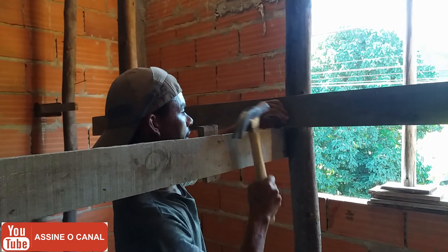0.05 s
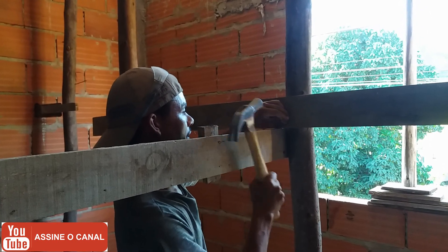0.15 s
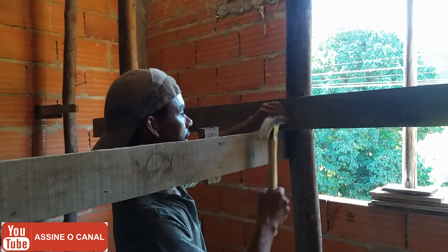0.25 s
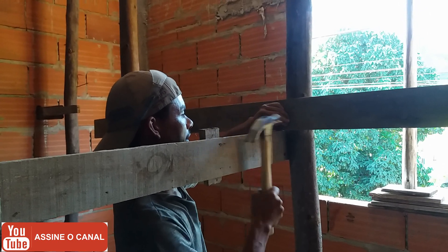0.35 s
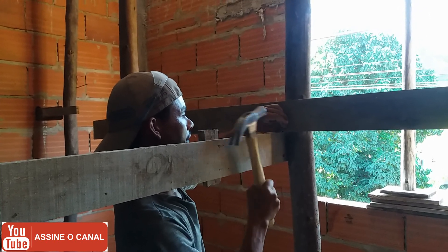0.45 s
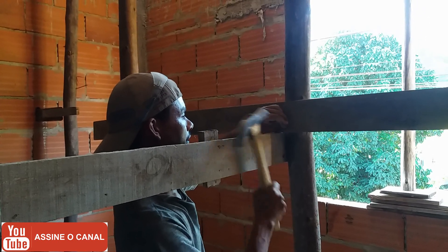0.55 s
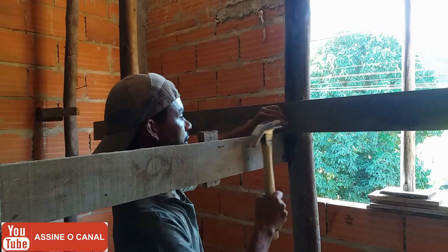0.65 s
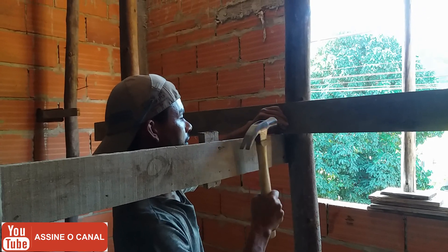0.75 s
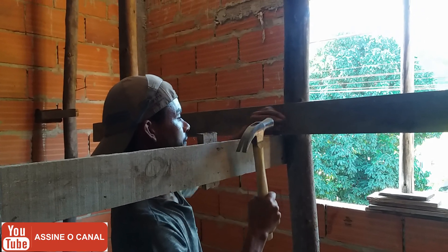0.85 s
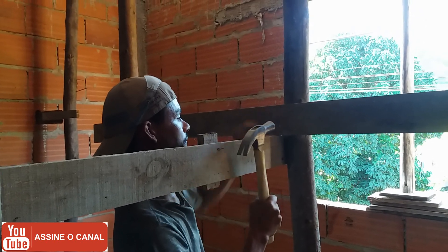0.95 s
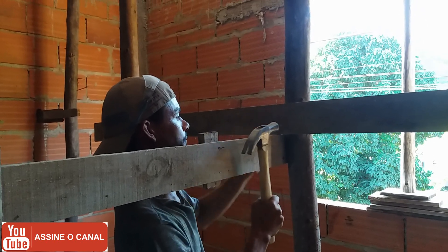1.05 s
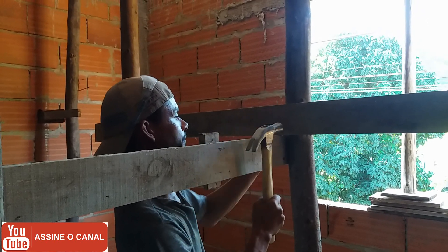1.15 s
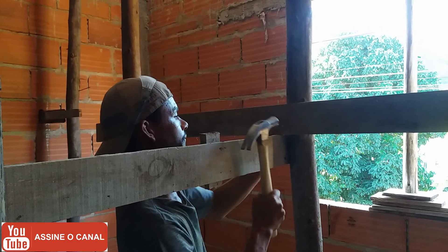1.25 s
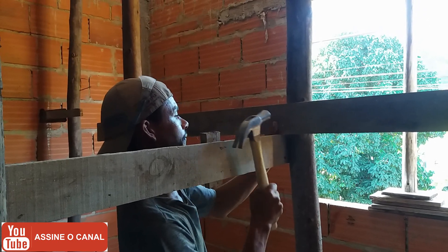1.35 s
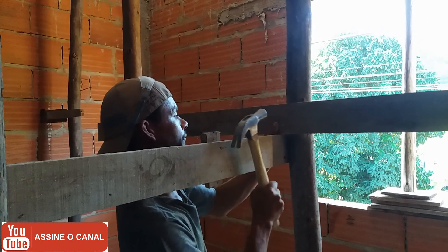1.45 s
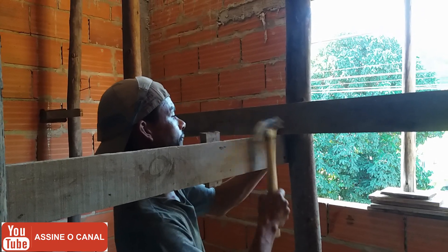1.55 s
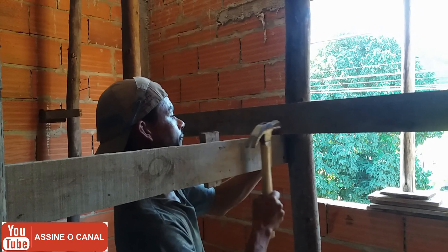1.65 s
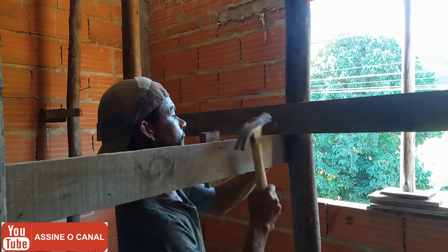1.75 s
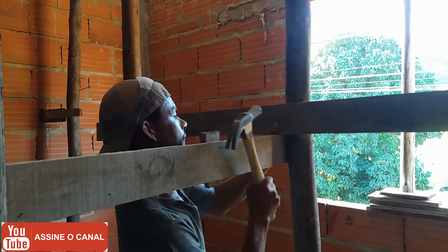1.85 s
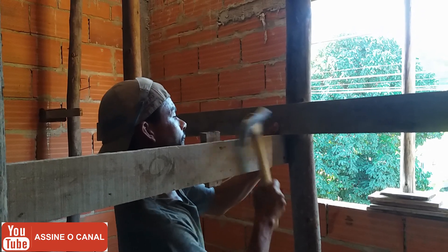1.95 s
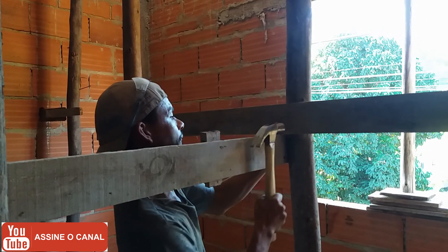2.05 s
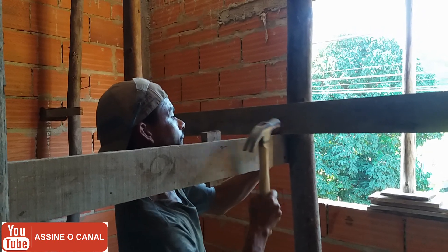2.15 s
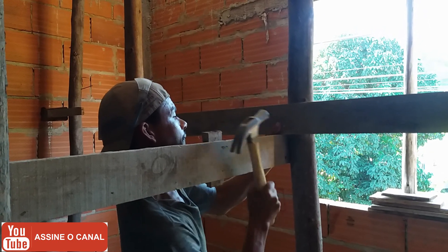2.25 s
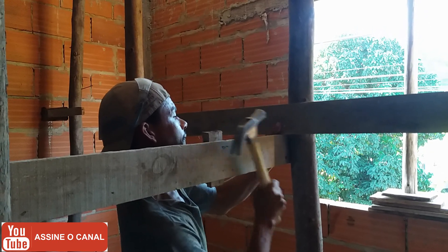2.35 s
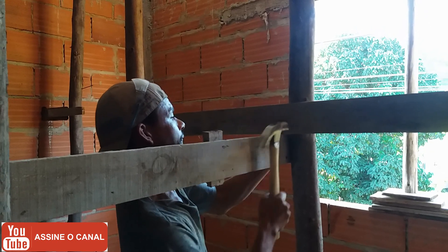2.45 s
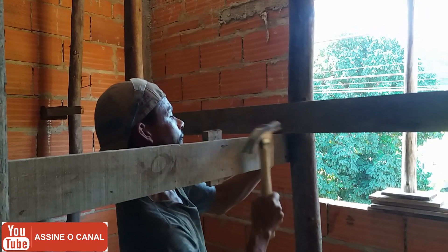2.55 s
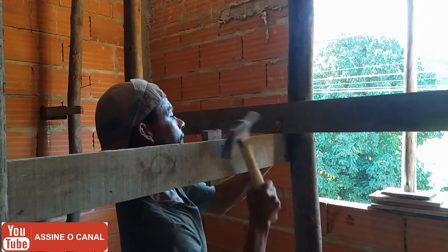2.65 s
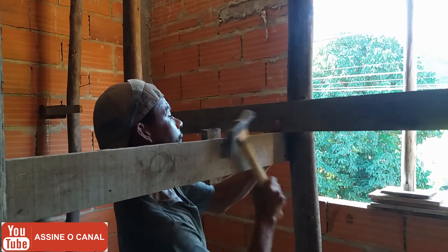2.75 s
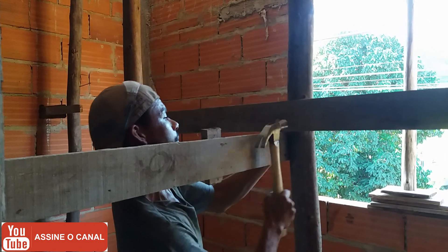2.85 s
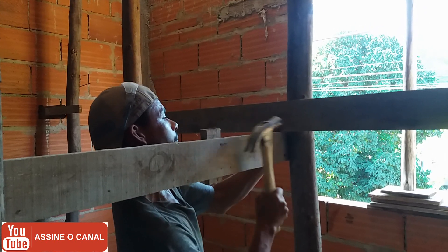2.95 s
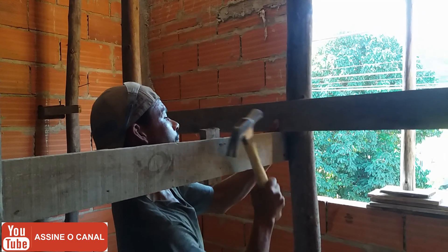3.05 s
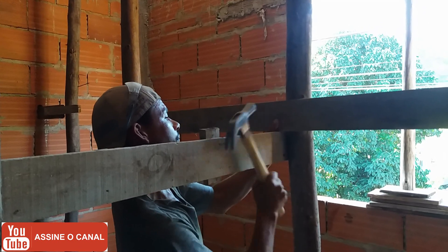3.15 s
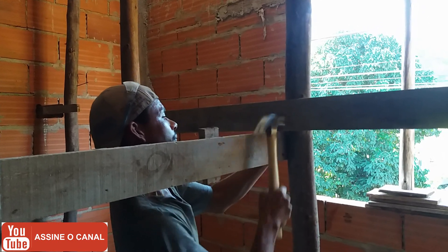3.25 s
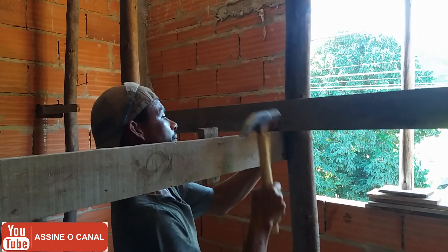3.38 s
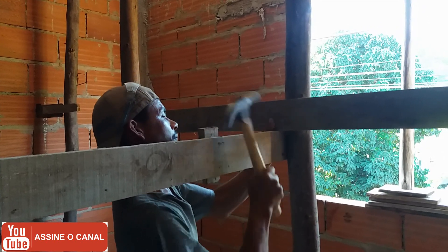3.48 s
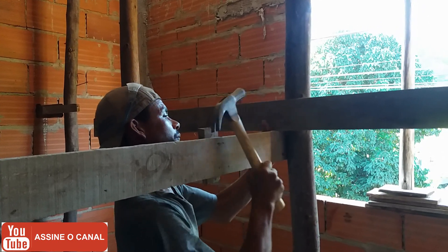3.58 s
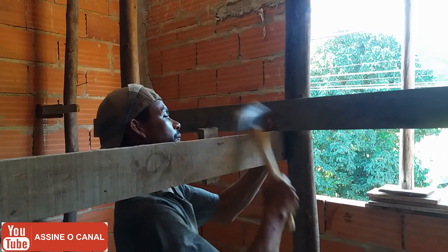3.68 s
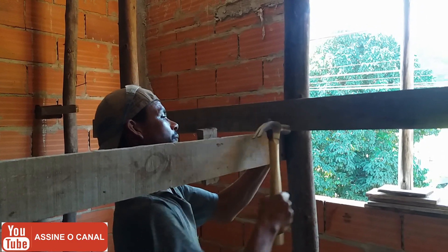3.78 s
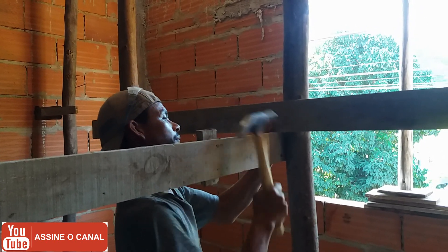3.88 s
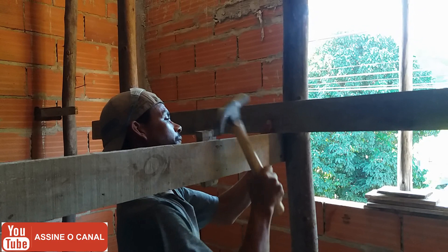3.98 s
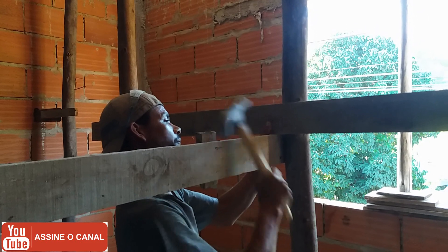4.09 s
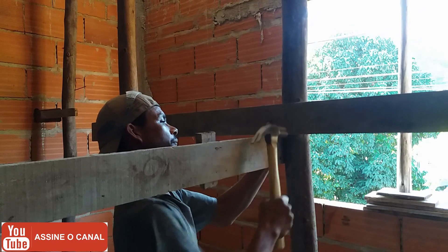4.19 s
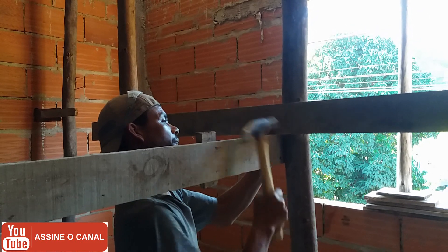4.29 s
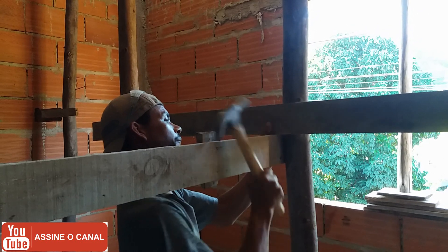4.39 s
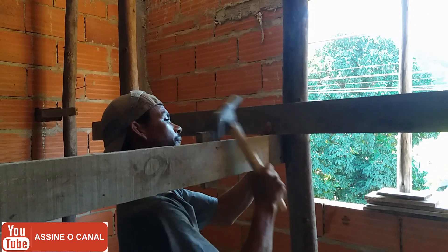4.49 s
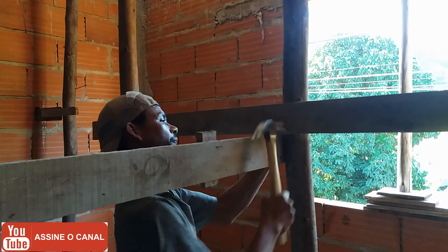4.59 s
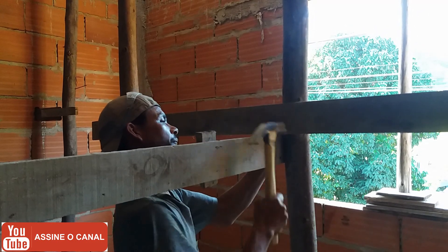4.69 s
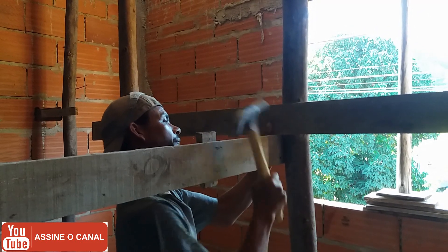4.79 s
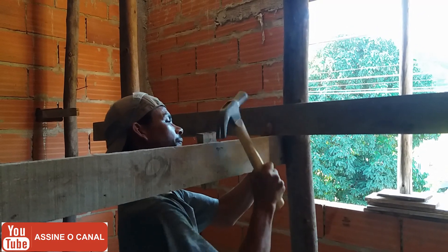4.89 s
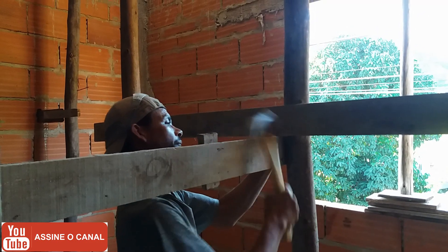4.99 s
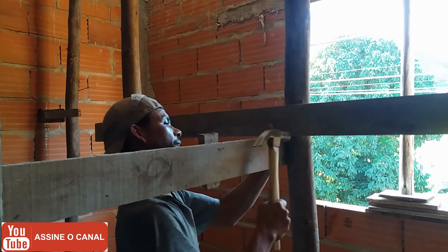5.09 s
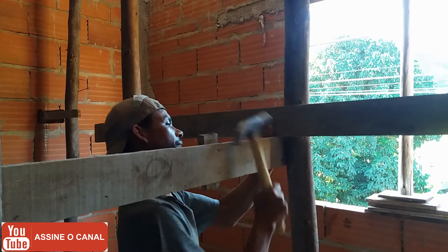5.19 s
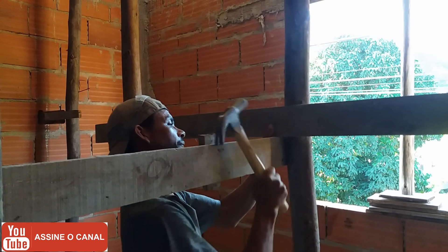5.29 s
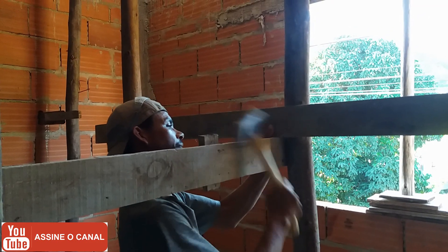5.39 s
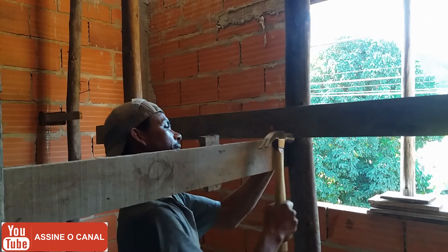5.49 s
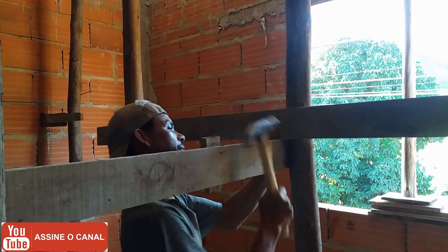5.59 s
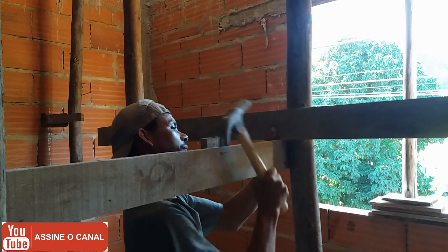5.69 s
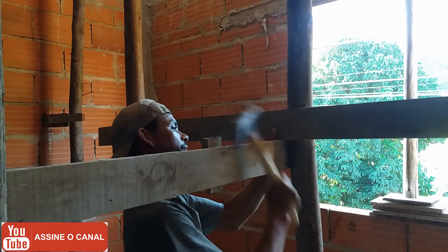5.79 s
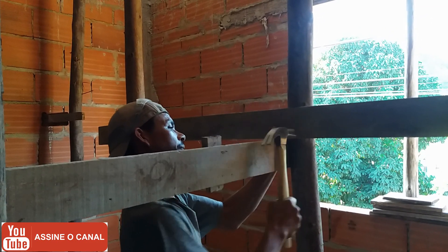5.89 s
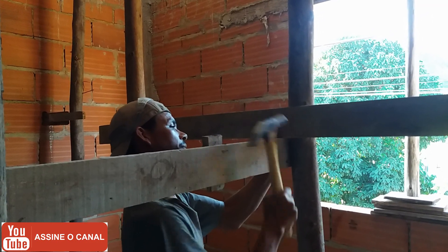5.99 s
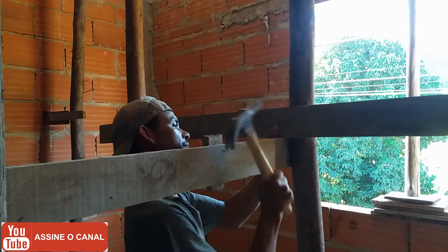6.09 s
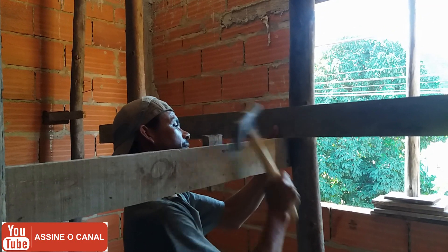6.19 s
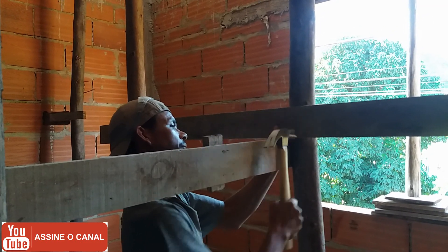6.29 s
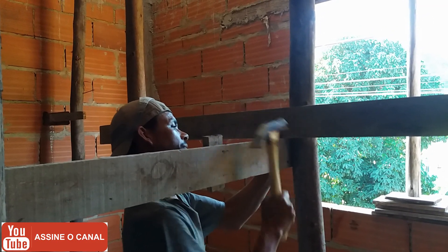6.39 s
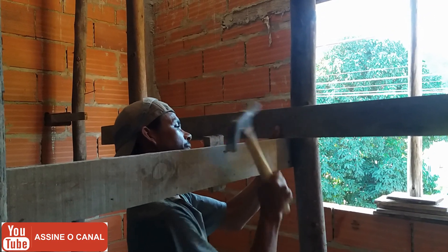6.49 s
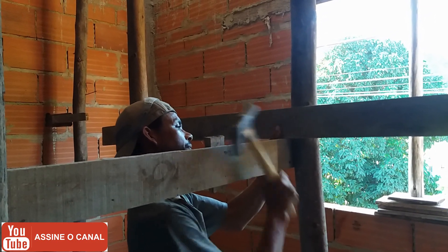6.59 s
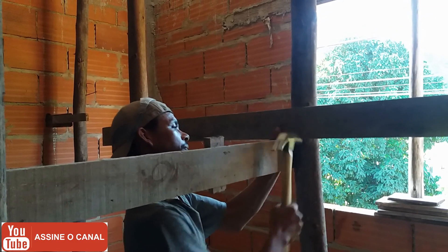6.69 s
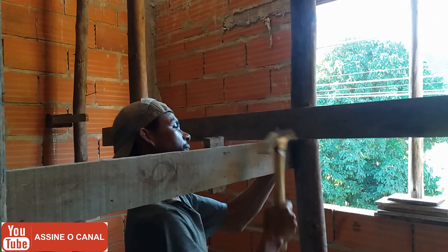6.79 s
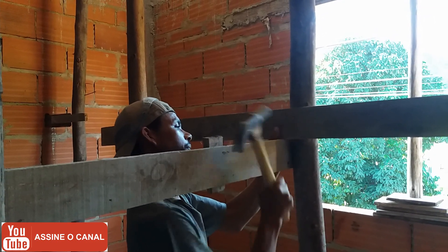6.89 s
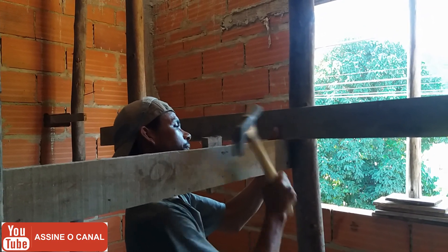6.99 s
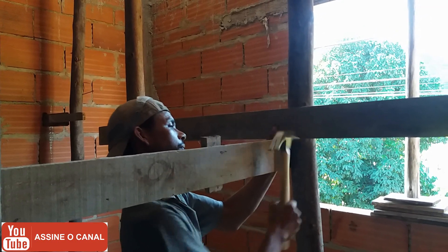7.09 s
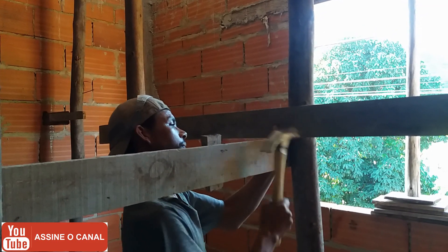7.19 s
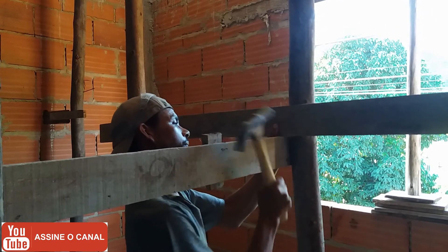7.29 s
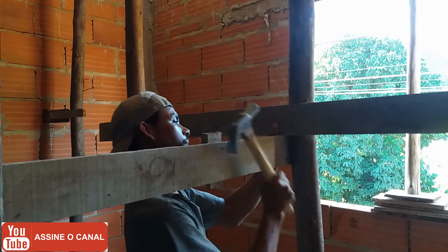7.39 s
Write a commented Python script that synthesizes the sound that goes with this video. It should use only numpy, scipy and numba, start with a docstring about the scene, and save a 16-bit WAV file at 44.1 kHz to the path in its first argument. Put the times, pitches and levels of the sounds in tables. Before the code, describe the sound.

Loud, dry steel-on-nail strikes with hollow timber knocks, first three in a row, then after a gap a long regular run. The early blows thump deeper; later ones are leaner and clickier. A thin steel tone lingers after each hit in the short echo of a half-open brick shell. Tiny scuffs and ticks fall between blows. The close microphone sounds muffled, with peaks squashed.

```python
"""Sharp hammer blows, each a click with a woody thump and a ring, drive a nail through a batten into a prop.
An impulse excites damped resonances: steel clicks, broad knocks of nail and timber, long clustered modes.
A thin steel tone follows every blow, and filtered noise gives the reverberation of a bare brick shell.
A squeak, scuffs and ticks fall between blows over quiet outdoor rumble through the open wall.
A dull microphone and a limiter that lets the first click pass colour the whole."""
import sys
import numpy as np
from scipy import signal
from scipy.fft import rfft, irfft
from scipy.io import wavfile
from scipy.ndimage import uniform_filter1d
from numba import njit

SR = 44100
rng = np.random.default_rng(int(sys.argv[2]) if len(sys.argv) > 2 else 0)


def bounce(signal):
    """Save signal as a 16-bit WAV file at the path given by the first command-line argument."""
    frames = np.transpose(np.atleast_2d(signal))
    limited = np.clip(frames, -1, 1)
    pcm = np.round(limited * 32767).astype(np.int16)
    wavfile.write(sys.argv[1], SR, pcm)


N = 328085  # length [samples]

# Hammer blows, levels before mixing: (time [s], strike level [dB], sharp edge level [dB],
# timber thump level [dB], high batten mode level [dB], nail level [dB], nail pitch [Hz],
# nail overtone [Hz], head ring level [dB], head ring T60 [s])
BLOWS = [(0.005, -11, 8.5, -14.5, -13, -36.5, 1290, 1444, -64, 0.54),
         (0.3607, -10.5, 11, -13.5, -11, -5.5, 1400, 1790, -71.5, .8),
         (0.728, -10.5, 11, -15.5, -16, -10.5, 1360, 1763, -75, .5),
         (1.679, -12, 8.5, -16.5, -17, -12, 1314, 1720, -67.5, 0.58),
         (2.1206, -9.5, 11.5, -17.5, -15, -6, 1330, 1940, -65.5, 0.9),
         (2.542, -9.5, 10, -19.5, -27.5, -8.5, 1295, 2000, -55.5, 0.48),
         (2.942, -9, 11, -22.5, -15, -11, 1114, 2000, -57, .65),
         (3.361, -9, 11.5, -19, -12.5, -6, 1490, 1860, -67.5, 1.06),
         (3.832, -5, 11.5, -20.5, -12.5, -28.5, 1220, 1700, -68, 1.14),
         (4.259, -8, 9, -25.5, -15, -21.5, 1190, 1880, -53, 0.53),
         (4.677, -13, 5.5, -27.5, -16.5, -14, 1330, 2230, -61.5, 0.57),
         (5.114, -12.5, 7, -27.5, -18.5, -16.5, 1260, 2100, -65, .6),
         (5.536, -13, 7.5, -26.5, -20.5, -22, 1410, 1880, -66, .7),
         (5.949, -15, 8, -25.5, -23.5, -16, 1370, 1750, -71, 0.72),
         (6.359, -13, 10, -23.5, -21.5, -16, 1515, 1724, -65.5, 0.87),
         (6.767, -10, 11.5, -22.5, -19.5, -19.5, 1345, 1740, -64.5, 1.16),
         (7.173, -12.5, 14.5, -20.5, -14.5, -13.5, 1370, 1750, -65, 3.7)]
# Frequency response of the microphone: (frequency [Hz], gain [dB])
MICROPHONE = [(25, -18), (80, -11), (150, -0.5), (1000, -2.5), (2000, -8), (2400, -7), (2800, -11),
              (3400, -15), (4100, -24), (5200, -25.5), (8000, -34), (16000, -42.5)]
PREAMP_DB = 8


def undb(db):
    """Level to amplitude ratio: 20 dB is a factor of ten."""
    return 10 ** (np.asarray(db) / 20)


def on_log(hz, table, axis):
    """Interpolation of one table column on a logarithmic frequency axis."""
    table = np.array(table, float)
    return np.interp(np.log(np.maximum(hz, 1)), np.log(table[:, 0]), table[:, axis])


def colour(x, table):
    """Minimum-phase filtering: folding the cepstrum makes a given magnitude spectrum causal."""
    gain_db = on_log(np.fft.rfftfreq(4096, 1 / SR), table, axis=1)
    cepstrum = irfft(np.log(undb(gain_db)))
    cepstrum[1:2048] *= 2
    cepstrum[2049:] = 0
    impulse_response = irfft(np.exp(rfft(cepstrum)))
    return signal.fftconvolve(x, impulse_response)[:len(x)]


def band(x, hz, width_hz):
    """Resonance: a two-pole band-pass of given centre and bandwidth."""
    return signal.lfilter(*signal.iirpeak(hz, hz / width_hz, SR), x)


def unit(x):
    """Normalization to peak 1."""
    return x / np.abs(x).max()


def decay(t, t60):
    """Exponential decay of 60 dB in the time t60."""
    return np.exp(-np.log(1000) * t / t60)


def add(out, s, x):
    """Superposition: mix x into out from time s."""
    i = int(s * SR)
    out[i:i + len(x)] += x[:len(out) - i]


def hammer():
    """Impact excitation: returns direct clicks, short knocks and long modal rings of all blows."""
    # Modes of the prop: (frequency [Hz], relative level [dB], T60 [s])
    prop_modes = [(126, -5, .35), (146, 0, .3), (165, -4, .3), (185, -7, .28), (225, -10, .3),
                  (282, -10, .3)]
    # Modes of the batten: (frequency [Hz], relative level [dB], T60 [s])
    batten_modes = [(322, -2, .36), (399, -3, .36), (452, 0, .42), (487, -8, .3), (540, -5, .32),
                    (614, -10, .28), (692, -8, .3), (716, -7, .3), (780, -6, .3), (820, -8, .3),
                    (928, -3, .33), (1120, -7, .26), (1220, -9, .2), (1298, -9, .24), (1415, -9, .24),
                    (1490, -9, .25), (1655, -10, .25), (1753, -8, .26), (1815, -10, .26), (1892, -10, .26),
                    (2160, -12, .25)]
    # Modes of the scaffold: (frequency [Hz], relative level [dB], T60 [s])
    scaffold_modes = [(56, -8, 1.), (78, -4, .9), (93, 0, .85), (104, -4, .7)]
    flight_s = 0.00056  # from nail to microphone
    boom_db, batten_low_db = -18, 4  # relative to the thump
    boom_growth, boom_from_db = 1, -17.5  # extra boom dB per dB of thump above this level
    batten_split_hz = 650  # between low and high batten modes

    clicks, short, long = np.zeros(N), np.zeros(N), np.zeros(N)
    t = np.arange(SR * 3 // 5) / SR
    # modes build up as the bending wave spreads
    spread = (1 - np.exp(-t / 0.016)) * np.sqrt(1 - t / t[-1])
    chance = rng.standard_normal((len(BLOWS), 200))
    for blow, luck in zip(BLOWS, chance):
        s, strike_db, edge_db, prop_db, high_db, nail_db, nail_hz, over_hz, _, _ = blow
        s = s + flight_s
        deep_db = prop_db + boom_db + boom_growth * max(prop_db - boom_from_db, 0)
        low_db = prop_db + batten_low_db

        steel_click(clicks, s, strike_db, luck)
        rattle(clicks, s, edge_db)
        # broad resonances: (centre [Hz], width [Hz], peak level [dB])
        resonances = [(95., 50., deep_db - 10), (150., 120., prop_db),
                      (410., 400., low_db), (850., 550., high_db),
                      (nail_hz, 510., nail_db), (over_hz, 800., strike_db + 1.5),
                      (3100., 700., strike_db - 20.5)]
        add(short, s, knock(edge_db, resonances))

        prop = ring(prop_modes, luck, t, scatter_db=3.5, detune=0.01)
        add(long, s, 0.25 * undb(prop_db) * spread * prop)
        boom = ring(scaffold_modes, luck[40:], t, scatter_db=1.0, detune=0.024)
        add(long, s, 1.1 * undb(deep_db) * spread * boom)
        struck = [(hz, db + (low_db if hz < batten_split_hz else high_db), t60)
                  for hz, db, t60 in batten_modes]
        batten = ring(struck, luck[::-1], t, scatter_db=3.0, detune=.02)
        add(long, s, .11 * spread * batten)
    return clicks, short, long


def steel_click(clicks, s, strike_db, luck):
    """Steel on steel: an impulse rings the face for a cycle or two, then echoes off timber and wall."""
    # Early reflections of the click: (delay [s], amplitude ratio)
    click_echoes = [(.00097, .75), (.0058, 0.41)]
    echo_scatter = .05  # share of the delay
    impulse = (np.arange(2000) == 0) * 1.
    click = undb(strike_db + 9.5) * unit(band(impulse, 2040, 1050))
    add(clicks, s, click)
    for (delay_s, gain), off in zip(click_echoes, luck[100:]):
        add(clicks, s + delay_s * (1 + echo_scatter * off), gain * click)
    # grit on the face: brief differenced noise
    grit = np.diff(luck) * np.exp(-np.arange(len(luck) - 1) / SR / .0012)
    add(clicks, s, undb(strike_db) * 0.41 * grit)


def rattle(clicks, s, edge_db):
    """Gritty treble: noise of widely scattered level, differenced twice and decaying exponentially."""
    level_db, t60_s, spread_db = -36, .2, 9.5  # level relative to the edge
    size, sign = rng.standard_normal((2, SR // 5))
    grains = np.diff(sign * undb(spread_db * size), 2)
    grains = grains / grains.std()
    fade = decay(np.arange(len(grains)) / SR, t60_s)
    add(clicks, s, undb(edge_db + level_db) * grains * fade)


def knock(edge_db, resonances):
    """Impulse response whose power spectrum sums broad resonances and an edge flat in the treble."""
    f = np.geomspace(20, SR / 2, 200)
    power = undb(2 * edge_db) / (1 + (4240.0 / f) ** 4)
    for hz, width_hz, db in resonances:
        peak = undb(db) * SR / (2 * np.pi * width_hz)
        detuning = (f - hz * hz / f) / width_hz
        power = power + (peak / (1 + detuning ** 2)) ** 2
    impulse = (np.arange(3000) == 0) * 1.
    return colour(impulse, np.transpose([f, 10 * np.log10(power)]))


def ring(modes, chance, t, scatter_db, detune):
    """Modal synthesis: clusters of three close partials, tuned and weighted afresh for each blow."""
    hz, db, t60 = np.repeat(np.transpose(modes), 3, axis=1)[:, :, None]
    gain = undb(db + scatter_db * chance[:len(hz), None])
    hz = hz * (1 + detune * chance[-len(hz):, None])
    fade = np.float32(-np.log(1000) * t / t60)
    phase = np.float32(2 * np.pi * hz * t)
    return gain[:, 0] @ (np.exp(fade) * np.sin(phase))


def head():
    """Decaying steel tone from blow to blow: it wavers as the head moves, sags as the swing speeds up."""
    steel_hz, sag_hz = 5885, 45
    rise_s, last_swing_s = .07, .42
    waver_db, waver_s = 2, .03
    out, hold = np.zeros(N), int(waver_s * SR)
    waver = uniform_filter1d(np.repeat(rng.standard_normal(N // hold + 1), hold), hold)[:N]
    starts = [blow[0] for blow in BLOWS]
    ends = starts[1:] + [starts[-1] + last_swing_s]
    for (s, *_, db, t60), end in zip(BLOWS, ends):
        t = np.arange(int((end - s) * SR)) / SR
        hz = steel_hz - sag_hz * (t / t[-1]) ** 4
        ramps = np.minimum(np.minimum(t / rise_s, (t[-1] - t) / .005), 1)
        tone = np.sin(2 * np.pi * np.cumsum(hz) / SR)
        add(out, s, ramps * undb(db - 60 * t / t60) * tone)
    # offset the gain of microphone and preamplifier at this pitch
    pickup_db = on_log(steel_hz, MICROPHONE, axis=1) + PREAMP_DB
    return out * undb(waver_db * waver - pickup_db + 6.5)


def squeak():
    """Gliding harmonic tone: the phase integrates the pitch, and the octave doubles that phase."""
    # Faint squeak: (time [s], pitch [Hz], level of the fundamental before mixing [dB])
    glide = [(1.59, 1120, -100), (1.61, 1125, -90), (1.65, 1140, -87), (1.678, 1180, -85)]
    out = np.zeros(N)
    s, hz, db = np.transpose(glide)
    t = np.arange(s[0], s[-1], 1 / SR)
    phase = 2 * np.pi * np.cumsum(np.interp(t, s, hz)) / SR
    tone = np.sin(phase) + 1.2 * np.sin(2 * phase)
    add(out, s[0], undb(np.interp(t, s, db)) * tone)
    return out


def rumbles():
    """Band-limited noise: soft scuffs and a low swell, as of a hand or boot shifting."""
    # Swells: (time [s], length [s], level before windowing [dB], centre [Hz], width [Hz])
    swells = [(2.842, .09, -50.5, 544, 450), (4.54, 0.15, -57, 168, 138), (7.082, 0.1, -61, 476, 448)]
    out = np.zeros(N)
    for s, length_s, db, hz, width_hz in swells:
        luck = rng.standard_normal(SR // 4)
        x = band(band(luck, hz, width_hz), hz, width_hz)[:int(length_s * SR)]
        add(out, s, undb(db) * np.sqrt(np.hanning(len(x))) * x / x.std())
    return out


def ticks():
    """Struck resonances: brief decaying noise bursts excite two bands, giving faint dry ticks."""
    # Hard ticks: (time [s], peak level of the upper band before recording [dB])
    tick_times = [(2.8449, -51.5), (2.8666, -44), (2.8834, -44)]
    out, t = np.zeros(N), np.arange(SR // 20) / SR
    for s, db in tick_times:
        burst = rng.standard_normal(len(t)) * np.exp(-t / 0.0022)
        upper = unit(band(burst, 4600.0, 400.))
        lower = unit(band(burst, 2550., 300.))
        add(out, s, undb(db) * (upper + 0.36 * lower))
    return out


def room():
    """Diffuse reverberation: noise bands decay at their own rates, with a slower faint tail from beyond."""
    # Reverberation: (frequency [Hz], relative level [dB], T60 [s],
    # relative level of the slow tail from the spaces beyond [dB])
    reverberation = [(48.5, -6.5, 0.95, -10), (93, 5.5, 0.28, -30), (197, 4, 0.39, -37),
                     (426, 8, 0.26, -24.5), (600, 6, 0.45, -38), (760, 9, 0.29, -41.5),
                     (1000, 8, 0.46, -54.5), (2000, 8, 0.4, -55), (3700, -7.5, 0.16, -48.5),
                     (8000, -6.5, 0.13, -42.5), (15600, -4.5, 0.059, -39)]
    room_db, rise_s, beyond_t60_s = 9, 0.007, 1.25
    t, out = np.arange(2 * SR) / SR, 0
    for hz in 40 * 2 ** np.arange(0, 8.9, 1 / 3):  # third-octave steps
        t60 = on_log(hz, reverberation, axis=2)
        beyond = undb(on_log(hz, reverberation, axis=3)) * decay(t, beyond_t60_s)
        noise = band(rng.standard_normal(len(t)), hz, hz / 4)
        tail = noise * (decay(t, t60) + beyond)
        out = out + undb(on_log(hz, reverberation, axis=1)) * tail
    out = out * (1 - np.exp(-t / rise_s)) * (1 - t / 2)
    return undb(room_db) * out / np.sqrt(np.sum(out ** 2))


def air():
    """Shaped noise of slowly wandering level: quiet outdoor rumble through the open wall."""
    # Noise spectrum behind the microphone: (frequency [Hz], relative spectral density [dB per Hz])
    spectrum = [(15, -8), (25, -9.5), (27, -10), (108, 3.5), (212, -7.5), (326, -5), (354, -3.5),
                (591, -18.5), (1890, -27.5), (3340, -38.5), (16000, -44.5)]
    # Background level behind the microphone, before the drift: (time [s], level [dB])
    air_level = [(0, -52), (1.5, -64.5), (3, -67.5), (5, -78.5), (7.44, -59.5)]
    before_mic = [(hz, db - on_log(hz, MICROPHONE, axis=1)) for hz, db in spectrum]
    x = colour(rng.standard_normal(N), before_mic)
    steps = np.repeat(rng.standard_normal(N // 4000 + 1), 4000)
    drift = uniform_filter1d(steps, 4000)[:N]
    level_db = np.interp(np.arange(N) / SR, *np.transpose(air_level))
    return undb(level_db + 1.5 * drift) * x / np.std(colour(x, MICROPHONE))


def scene():
    """Superposition of direct and reverberant sound; each blow lands elsewhere and blends two responses."""
    clicks, short, long = hammer()
    short = short + squeak()
    starts = np.array([blow[0] for blow in BLOWS]) * SR
    blend = rng.uniform(0, np.pi, len(BLOWS) + 1)[np.searchsorted(starts, np.arange(N))]
    source = short + 0.22 * long
    wet = sum(signal.fftconvolve(share * source, room())[:N]
              for share in (np.cos(blend), np.sin(blend)))
    direct = clicks + 0.32 * short + long
    return (direct + wet + head() + rumbles() + ticks() + air())[None]


@njit
def follow(x, release):
    """Peak detection: the envelope jumps up at once and sinks exponentially."""
    y, e = np.empty(len(x)), 1e-6
    for i in range(len(x)):
        e = max(x[i], e * release)
        y[i] = e
    return y


def record(dry):
    """Dull microphone, limiter too slow for the first click, saturation of peaks and a low-pass."""
    limit_db, ratio = -3, 24
    attack_s, release_s = .003, 0.12  # time constants
    top_hz = 16700
    x = colour(dry[0], MICROPHONE) * undb(PREAMP_DB)
    envelope = follow(np.abs(x), np.exp(-1 / (release_s * SR)))
    over = np.maximum(envelope / undb(limit_db), 1)
    lag = np.exp(-1 / (attack_s * SR))
    reduction = 1 - over ** (1 / ratio - 1)
    gain = 1 - signal.lfilter([1 - lag], [1, -lag], reduction)
    rounded = np.tanh(.9 * x * gain) / .9
    low_pass = signal.ellip(10, .2, 70, top_hz, fs=SR, output="sos")
    return signal.sosfilt(low_pass, rounded)[None]


dry = scene()
out = record(dry)
bounce(out)
```